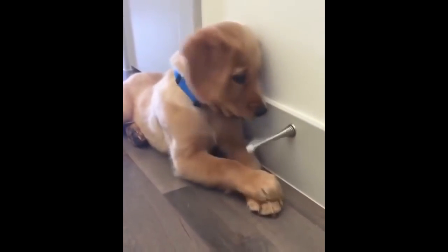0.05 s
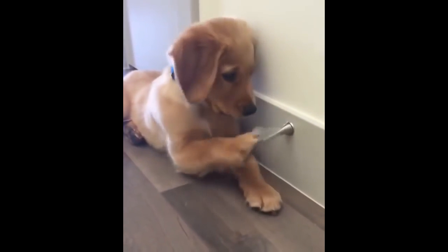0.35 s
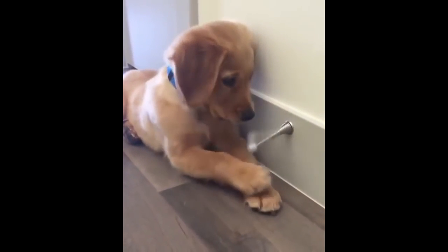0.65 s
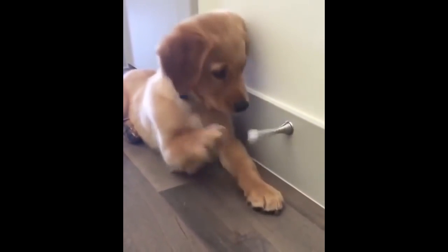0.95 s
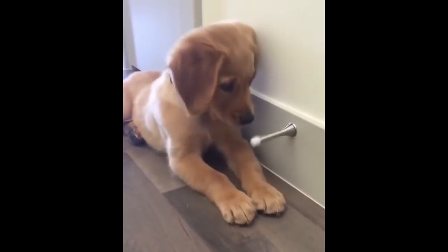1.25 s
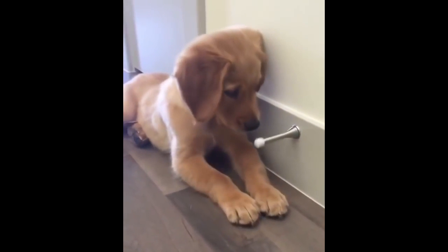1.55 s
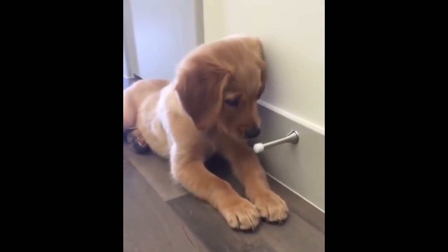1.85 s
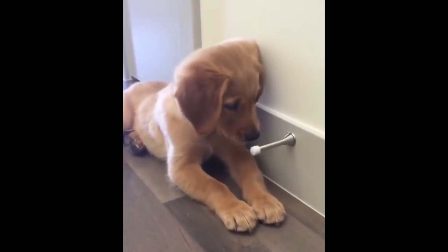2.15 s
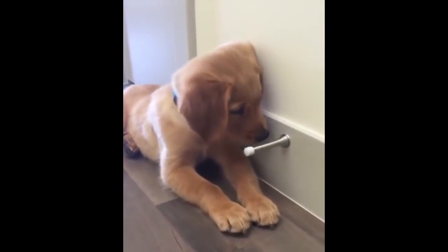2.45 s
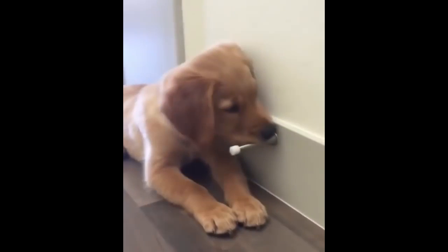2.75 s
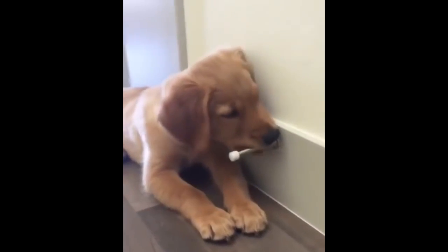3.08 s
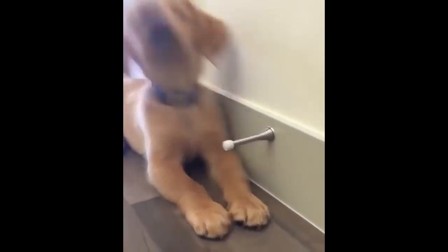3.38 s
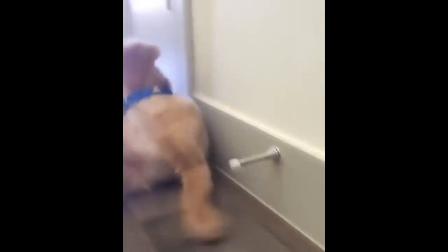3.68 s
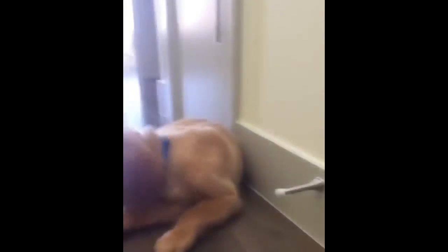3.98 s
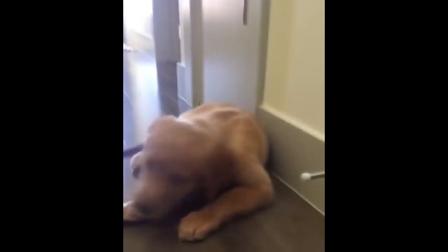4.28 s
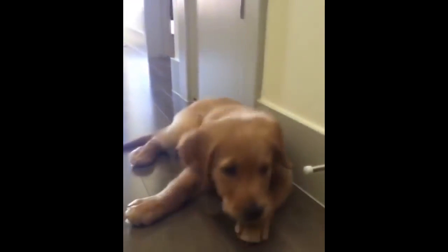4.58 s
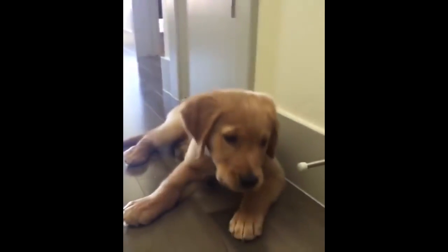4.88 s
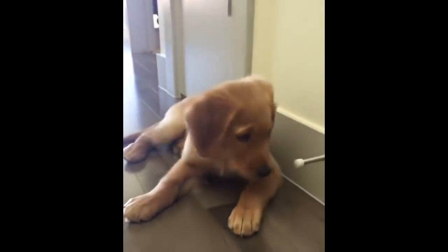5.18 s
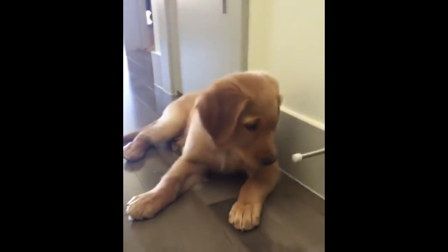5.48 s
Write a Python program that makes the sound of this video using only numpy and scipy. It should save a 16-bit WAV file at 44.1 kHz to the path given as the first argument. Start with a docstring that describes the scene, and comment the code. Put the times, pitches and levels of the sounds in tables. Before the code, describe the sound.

Right at the start, a puppy's paw flicks a coil spring door stopper close to the microphone. It gives a loud, rattling twang, with rapid metallic ticks and clanks and thumps from the skirting board over a lingering ring. At about 0.7 seconds a second flick renews the buzz, and a padded paw thud lands near 1.3 seconds. The rattle quickens as it weakens, settling into a soft purr from about 1.6 to 2.5 seconds, with a faint, thin squeak around 1.8 seconds. One quiet low note throbs near 2.6 seconds. The puppy's nose lightly taps the spring at about 2.8 seconds, and soft bumps follow until 3.4 seconds as it gets up. Fur and body brush faintly over the floor from 3.6 to 4 seconds, and a paw slides near 4.7 seconds. The quiet room's low hum remains until the end, at about 5.5 seconds.

```python
"""A brush of fur, then a rattling twang: a puppy paws twice at a coil-spring door stopper, close to the
microphone in a quiet room with a low hum. On every swing the coils clash: a tick, a clank and a thump
of the skirting board, over the long ring of wire and room. The swing settles to a soft purr, a thin
squeak and one last note. The puppy noses the spring, gets up and slides over the floor, and the
microphone follows it."""
import sys
import numpy as np
from scipy import signal
from scipy.fft import rfft, irfft
from scipy.io import wavfile

SR = 44100
rng = np.random.default_rng(int(sys.argv[2]) if len(sys.argv) > 2 else 0)


def log_audio(samples):
    """Write samples as a 16-bit WAV file to the path given in sys.argv[1]."""
    # one column per channel
    frames = np.atleast_2d(samples).T
    # limit to full scale, then quantise
    limited = np.clip(frames, -1, 1)
    pcm = np.round(limited * 32767).astype(np.int16)
    wavfile.write(sys.argv[1], SR, pcm)


N = 248283
TIME = np.arange(N) / SR


def from_db(db):
    """Decibels to gain."""
    return 10 ** (np.asarray(db) / 20)


def rms_one(x):
    """Scale to rms 1."""
    return x / np.sqrt(np.mean(x ** 2) + 1e-20)


def at_hz(points, hz):
    """Read (f/Hz, value) points on a log-frequency axis."""
    f, value = np.transpose(points)
    return np.interp(np.log(np.maximum(hz, 1)), np.log(f), value)


def colour(x, spectrum):
    """Give a signal a smooth spectrum of (f/Hz, level/dB) points."""
    hz = np.fft.rfftfreq(len(x), 1 / SR)
    return irfft(rfft(x) * from_db(at_hz(spectrum, hz)), len(x))


def band(x, low_hz, high_hz, order=2):
    """Causal band-pass."""
    sos = signal.butter(order, [low_hz, min(high_hz, .45 * SR)], "band", fs=SR, output="sos")
    return signal.sosfilt(sos, x)


def flutter(low_hz, high_hz):
    """Random wavering within a band, at rms 1."""
    return rms_one(band(rng.standard_normal(N), low_hz, high_hz))


def gate(start_s, end_s, edge_s):
    """Gain of 1 from start to end, with a ramp on either side."""
    return np.interp(TIME, [start_s - edge_s, start_s, end_s, end_s + edge_s], [0, 1, 1, 0])


def convolve(x, response):
    """Play a signal through an impulse response."""
    return signal.fftconvolve(x, response)[:N]


def mode(hz, t60):
    """One second of a sine that dies by 60 dB in t60 seconds."""
    t = TIME[:SR]
    return np.sin(2 * np.pi * hz * t) * from_db(-60 * t / t60)


def add(out, s, sound):
    """Mix a sound in at time s."""
    start = int(s * SR)
    out[start:start + len(sound)] += sound[:N - start]


def slides(grain=0.32, patchy_db=3.0, attack_s=0.037, release_s=0.036):
    """Fur, body and paws brush a surface: a hiss that catches unevenly and shifts as the contact moves."""
    # strokes: start/s, end/s, level/dB, what slides
    strokes = [(0.0, 0.05, -53.5, "fur"), (2.789, 2.853, -70, "fur"), (3.57, 3.67, -70.5, "fur"),
               (3.68, 3.784, -61.5, "body"), (3.813, 3.87, -64.5, "body"), (3.918, 3.948, -68.5, "fur"),
               (3.963, 4.04, -76, "body"), (4.262, 4.293, -74.5, "fur"), (4.605, 4.665, -64.5, "paw"),
               (4.674, 4.732, -60, "paw"), (4.745, 4.763, -64, "paw")]
    # colours of fur on the spring, and of body and paw on the floor: f/Hz, relative level/dB
    fur = [(700, -17.5), (1500, -2), (3500, -0.5), (6000, -2.5), (9000, -13), (14000, -12.5)]
    body = [(590, -42), (1000, -13.5), (1570, -9), (3190, -9), (3760, -0.5), (4800, -11), (6050, -4),
            (6910, -10.5), (8710, -7), (14000, -15)]
    paw = [(590, -42), (1000, -11.5), (1260, -16.5), (1520, -2), (2190, -2), (2980, -8.5), (3680, -7),
           (4390, -6), (8420, -5), (14000, -12)]
    hiss, edges = 0, np.geomspace(700, 16000, 9)
    for low, high in zip(edges, edges[1:]):
        pressure = from_db(patchy_db * flutter(3.7, 5.7))
        hiss = hiss + band(rng.standard_normal(N), low, high) * pressure
    hiss *= np.exp(grain * flutter(30, 300))
    spectra = {"fur": fur, "body": body, "paw": paw}
    coloured = {part: rms_one(colour(hiss, spectrum)) for part, spectrum in spectra.items()}
    out = np.zeros(N)
    for start, end, db, part in strokes:
        fade_db = 20 * (np.maximum(start - TIME, 0) / attack_s + np.maximum(TIME - end, 0) / release_s)
        out += coloured[part] * from_db(db - fade_db)
    return out


def room_tone(air_db=-60.5, waver=0.65):
    """Faint air noise and a wavering low hum, which drops as the microphone follows the puppy."""
    # colour of the air: f/Hz, relative level/dB
    air_colour = [(18, -35), (30, -10.5), (59, -2), (76, -12.5), (91, -2.5), (111, 1), (140, -17),
                  (212, -20), (311, -34), (345, -27), (446, -31.5), (548, -34), (871, -37.5), (1880, -43),
                  (14000, -56.5)]
    # tones of the hum: f/Hz, level/dB, half-width/Hz, change as the microphone moves/dB
    hum = [(54.3, -50, 3.9, -6), (104.5, -54.5, 2.6, -1)]
    # the microphone's move: start/s, end/s
    move_s = [3.7, 3.87]
    air = colour(rng.standard_normal(N), air_colour)
    air = band(air, 110, 18000) + from_db(-21.5) * band(air, 20, 84)
    out = from_db(air_db) * air / np.std(band(air, 130, 14000, order=4))
    for hz, db, width, change_db in hum:
        unsteady = flutter(hz - width, hz + width)
        tone = np.sin(2 * np.pi * (hz * TIME + rng.random()))
        out += from_db(db + np.interp(TIME, move_s, [0, change_db])) * (tone + waver * unsteady)
    return out


def swings(zero_s=2.249):
    """Running count of swings, zero at zero_s; the spring is at a turning point on whole numbers."""
    # wide swings are slow, and the spring speeds up as they shrink: t/s, swing rate/Hz
    swing_rate = [(0.05, 14.665), (0.54, 16.187), (0.73, 16.833), (1.0, 18.166), (1.25, 20.34),
                  (1.5, 23.553), (1.8, 24.018), (2.4, 25.129), (2.8, 25.8)]
    turns = np.cumsum(np.interp(TIME, *np.transpose(swing_rate))) / SR
    return turns - np.interp(zero_s, TIME, turns)


def purr(uneven_db=3.0, jitter_s=0.0013, fade_db_per_s=10.5, count=70):
    """Small swings nudge the board, higher one way and lower the other, while friction drains them."""
    # the two nudges: share of a swing after the turning point, lowest f/Hz, highest f/Hz, level/dB
    halves = [(0.17, 276, 385, -2), (0.64, 185, 280.3, 0.5)]
    # spells of purring: start/s, end/s, level at the start/dB
    spells = [(0.0, 0.03, -40), (1.573, 2.55, -45.5)]
    turns, out = swings(), 0
    draws = rng.standard_normal((len(halves), 2, count))
    for (share, low_hz, high_hz, db), (late, force) in zip(halves, draws):
        s = np.interp(np.floor(turns[0]) + np.arange(count) + share, turns, TIME) + jitter_s * late
        nudges = np.zeros(N)
        nudges[np.clip(s * SR, 0, N - 1).astype(int)] = from_db(uneven_db * force)
        out = out + from_db(db) * band(nudges + 1e-18, low_hz, high_hz, order=3)
    gain = sum(from_db(db - fade_db_per_s * np.maximum(TIME - start, 0)) * gate(start, end, edge_s=0.11)
               for start, end, db in spells)
    return out / np.std(out[:2 * SR]) * gain


def clash_rows(uneven_db=2.36, uneven_closing=0.28, blur_per_db=0.55, most_blur=1.6, count=64):
    """Every clash, laid out like knocks: coils close at each turn, harder on the side they lean to."""
    # clashes that stand out, as the coils slam shut or the nose taps them:
    # t/s, thump/dB, clank/dB, tick/dB, closing time/s, clank f/Hz, tick f/Hz
    knocks = [(0.051, -13, -19, -25, 0.00041, 1510, 8100), (0.0852, -12.5, -18, -27, .0011, 2020, 4200),
              (0.1183, -11.5, -12.5, -19, 0.00032, 1490, 10400),
              (0.1843, -16, -18.5, -25.5, 0.00091, 2250, 8600), (0.3467, -18, -19, -26, .0007, 1733, 4600),
              (0.5364, -16.5, -17, -31, 0.00069, 1150, 9000), (0.733, -11, -13.5, -27, 0.00091, 1540, 8400),
              (0.7593, -12, -14.5, -23, 0.00081, 2240, 8800), (0.793, -24.5, -38, -42, 0.0015, 2890, 8300),
              (0.8195, -16.5, -24, -26, 0.0016, 2760, 9200), (0.877, -20.5, -35, -35, 0.0013, 2976, 8200),
              (0.9057, -21, -24, -34.5, 0.00062, 1580, 7600), (0.9599, -20, -18.5, -32, 0.001, 2081, 5000),
              (0.989, -24.5, -25, -33, 0.0018, 2490, 9100), (1.0433, -19, -24, -37, 0.00088, 895, 8400),
              (1.0956, -20.5, -24, -38, 0.0014, 1457, 4100), (1.1256, -20, -25.5, -28, 0.00093, 1180, 6600),
              (1.147, -15, -20.5, -33.5, 0.0017, 2240, 5000), (1.176, -18.5, -19, -29.5, .0011, 1440, 5900),
              (1.198, -19, -33, -39.5, 0.0015, 2640, 9200), (1.227, -21, -28.5, -31, 0.0011, 1220, 5600),
              (1.3442, -20, -23.5, -46, 0.00067, 2150, 4500), (1.369, -18, -24.5, -29, .0007, 1250, 11500),
              (1.389, -21.5, -34, -47, 0.0016, 900, 4100),
              (1.414, -20.5, -27.5, -34.5, 0.00098, 1180, 6200),
              (1.459, -30, -39, -35.5, 0.0016, 2250, 6800), (1.476, -23.5, -30, -42, 0.001, 1940, 4100),
              (1.502, -21.5, -28.5, -38, .0013, 1150, 5300), (1.629, -24.5, -33, -38.5, 0.0011, 1077, 6600),
              (1.844, -30, -40, -67, 0.0014, 840, 4200), (2.049, -38.5, -51, -65, .0013, 846, 4200),
              (2.09, -36, -46, -63, 0.0018, 833, 4200), (2.13, -39, -62, -80, 0.0014, 833, 4200),
              (2.842, -44, -52, -59, 0.0019, 1700, 7060), (2.8552, -47, -46, -60, .0005, 1995, 4400)]
    # spells of rattling: first clash/s, end/s, back swing's lead/s,
    # clank over thump/dB, tick over thump/dB, closing time/s
    rattles = [(0.051, 0.55, 0.001, -1, -10, 0.00088), (0.7311, 1.49, 0.0016, -6, -9.5, .0012),
               (1.501, 1.825, 0.0021, -9, -16, 0.0013), (1.8454, 2.147, 0.001047, -4, -22, .0012),
               (2.169, 2.42, 0.00091, -14, -8, 0.00037)]
    # force of each twang: t/s, thump on the harder side/dB, lean (out swing minus back swing)/dB
    first_twang = [(0.15, -15, 8.5), (0.22, -20.5, -4), (0.3, -17.5, -3.5), (0.54, -20, -3)]
    second_twang = [(0.83, -31, -14), (0.92, -25, 2.5), (1.08, -26.5, -2.5), (1.179, -39, 7.5),
                    (1.28, -26.5, -1), (1.409, -20.5, 12.5), (1.499, -22.5, 8.5), (1.671, -24, 11),
                    (1.771, -38, 3), (1.85, -36.5, 10.5), (1.979, -50, 1.5), (2.099, -34.5, 13),
                    (2.17, -58, -1), (2.29, -55, 18), (2.41, -67.5, 14)]
    # share of the lean felt by: thump, clank, tick
    lean_share = [0.782, 1.6, 1.4]
    pitch_ranges_hz = (860, 2400), (4000, 10440)   # clank, tick: set by where the coils meet
    turns, rows = swings(), list(knocks)
    twang_s, force_db, lean_db = np.transpose(first_twang + second_twang)
    knock_s = np.array(knocks)[:, 0]
    for first, until, early_s, clank_db, tick_db, close_s in rattles:
        first_turn = np.interp(first, TIME, turns)
        for k, (chance, place) in enumerate(zip(rng.standard_normal((count, 4)), rng.random((count, 2)))):
            back = k % 2
            s = np.interp(first_turn + k / 2, turns, TIME) - back * early_s
            if s > until or np.min(np.abs(knock_s - s)) < .01:   # a knock replaces its swing's clash
                continue
            lean = np.interp(s, twang_s, lean_db)
            loss_db = max(0, lean if back else -lean) * np.array(lean_share)
            hard_side_db = np.interp(s, twang_s, force_db) + np.array([0, clank_db, tick_db])
            db = hard_side_db - loss_db + uneven_db * chance[:3]
            blur = min(1 + blur_per_db * loss_db[0], most_blur)   # the weaker side closes more slowly
            pitches = [low * (high / low) ** p for (low, high), p in zip(pitch_ranges_hz, place)]
            rows.append((s, *db, blur * close_s * np.exp(uneven_closing * chance[3]), *pitches))
    return rows


def coil(low_hz, high_hz, echo, travel_s=0.0013, echo_s=0.0031, size=4096):
    """One band of a clash: highs outrun lows down the wire, and the wave comes back once from the tip."""
    # colour of one clash: f/Hz, relative level/dB
    clash_colour = [(100, -8.5), (200, -7), (350, 3), (470, -10), (610, -7.5), (780, -6.5), (1100, -4.5),
                    (2100, -10), (3050, -11.5), (3700, -15), (4350, -14), (4950, -17.5), (6200, -14.5),
                    (7700, -22.5), (8550, -18.5), (9600, -22), (11000, -26.5), (13500, -21.5)]
    # broad resonances of board and coil: f/Hz, width/Hz, lift/dB
    resonances = [(155, 25, 2), (262, 21, 3), (293, 38, 0.5), (383, 140, 4), (544, 28, 4), (634.3, 77, 3.5),
                  (897, 31, 5), (1058, 110, 7), (1174, 100, 3), (1410, 110, 5), (1540, 180, 3),
                  (1830, 160, 6), (2050, 90, 3), (2200, 120, 5.5), (2520, 140, 4.5), (2780, 120, 1.5),
                  (3113, 110, 1.5)]
    hz = np.fft.rfftfreq(size, 1 / SR)
    phase = 4 * np.pi * travel_s * np.sqrt(1000 * hz)   # delay: travel_s at 1 kHz, falling as 1/sqrt(f)
    tip_echo = 1 + echo * np.exp(-2j * np.pi * hz * echo_s)
    spectrum = from_db(at_hz(clash_colour, hz)) * np.exp(-1j * phase) * tip_echo
    wave = band(irfft(spectrum), low_hz, high_hz, order=4)
    for centre_hz, width_hz, lift_db in resonances:
        peak = signal.iirpeak(centre_hz, centre_hz / width_hz, fs=SR)
        wave = wave + (from_db(lift_db) - 1) * signal.lfilter(*peak, wave)
    return wave


def vigour(thump_db, light_db=-48, hard_db=-24.5):
    """0 for a light touch of the coils, 1 for a clash hard enough to rebound and set the wire singing."""
    return np.interp(thump_db, [light_db, hard_db], [0, 1])


def wire_pitch(hz, sharpness, lift_db, size=4096):
    """Response of the short length of wire that a clash sets singing."""
    f = np.maximum(np.fft.rfftfreq(size, 1 / SR), 1)
    return 1 + (from_db(lift_db) - 1) / (1 + 1j * sharpness * (f / hz - hz / f))


def clashes(rows, levels_db, response, scatter, spread, brighten, lead_s, graze, rebound,
            pitched=None, rebound_s=0.0032, count=48, size=4096):
    """Each clash is one main contact amid a quick run of lesser ones: coils graze, close and rebound."""
    out, start = np.zeros(N), size // 8
    octaves = np.log2(np.maximum(np.fft.rfftfreq(size, 1 / SR), 100) / 1000)
    for k, (s, thump_db, _, _, close_s, _, _) in enumerate(rows):
        when, force, early = rng.random((3, count))
        offsets = -np.log(-np.log(when)) * spread * close_s   # builds up quickly, thins out slowly
        strengths = scatter * (2 * force - 1) ** 3   # a few bite, most barely touch
        offsets[::3] -= graze * close_s * early[::3]   # some graze first, the earlier the lighter
        strengths[::3] *= 1 - early[::3]
        offsets[1::3] += rebound_s   # some part and meet once more
        strengths[1::3] *= rebound * vigour(thump_db)
        contacts = np.zeros(size)
        contacts[np.clip(start + (offsets * SR).astype(int), 0, size // 2)] = strengths
        contacts[start] += 1
        # with brighten above 0, a harder contact is shorter, so brighter
        tilt = from_db(brighten * (levels_db[k] + 16.5) * octaves)
        hit = irfft(rfft(contacts) * rfft(response) * tilt * (pitched[k] if pitched else 1))
        hit *= np.sqrt(.01 * SR / np.sum(hit ** 2))   # the energy of 10 ms at rms 1
        add(out, s - lead_s - start / SR, from_db(levels_db[k]) * hit)
    return out


def spring():
    """The stopper close up: thump, clank and tick of its coils, the purr, and the modes they ring."""
    # clear modes of room, board and wire (the lowest, near 97 Hz, a mode of the room): f/Hz, relative level/dB,
    # t60/s
    clear_modes = [(96.8, -17, 1.4), (195.3, -29, 1.8), (250.7, -25.5, 0.39), (291.4, -34, .8),
                   (344, -33.5, .8), (372.7, -30, 1.1), (546, -30, .7), (883, -31.5, 0.63),
                   (1110, -35.5, 0.9), (1410, -38, 0.6), (1816, -37, .6), (2262, -39, 0.62)]
    rows = clash_rows()
    _, thump_db, clank_db, tick_db, _, clank_hz, tick_hz = np.transpose(rows)
    thump = clashes(rows, thump_db, coil(120, 720, echo=0.25), scatter=0.22, spread=1.1,
                    brighten=0.096, lead_s=.0011, graze=.5, rebound=1.2)
    thump += from_db(-46.5) * convolve(thump, mode(hz=287.0, t60=0.024))   # the board swings on briefly
    clank_notes = [wire_pitch(hz, sharpness=4.5, lift_db=4.5) for hz in clank_hz]
    clank = clashes(rows, clank_db, coil(790, 3400, echo=0.1), scatter=.5, spread=1.2,
                    brighten=0.43, lead_s=0.0007, graze=0.55, rebound=.9, pitched=clank_notes)
    tick_notes = [wire_pitch(hz, sharpness=11, lift_db=8.1 * vigour(db))
                  for hz, db in zip(tick_hz, thump_db)]
    tick = clashes(rows, tick_db, coil(3400, 15000, echo=.2), scatter=1.3, spread=.8,
                   brighten=-0.035, lead_s=0.00028, graze=3.4, rebound=.55, pitched=tick_notes)
    direct = thump + from_db(-0.5) * clank + from_db(0.4) * tick + purr()
    modes = sum(from_db(db) * mode(hz, t60) for hz, db, t60 in clear_modes)
    return direct + from_db(-37.0) * convolve(direct, modes)


def ring_response(attack_s=0.00066, early_lift=0.72, early_s=0.009):
    """Countless close modes of wire and room: noise that dies band by band."""
    # colour of the ring: f/Hz, level relative to the clash/dB
    ring_colour = [(100, -1), (190, -4), (330, -8.5), (550, -3.5), (850, -2), (1700, -2.07), (2400, -0.5),
                   (3100, 1.5), (3800, -2.5), (6000, -8.5), (8800, -9.5), (13000, -7)]
    # decay of the ring: f/Hz, t60/s
    ring_t60 = [(100, 0.78), (300, 1), (800, 0.9), (1800, 0.94), (4000, 0.87), (13000, 0.32)]
    t, out = TIME[:SR + SR // 2], 0
    edges = np.geomspace(70, 16000, 13)
    hz = np.fft.rfftfreq(len(t), 1 / SR)
    noise = rfft(rng.standard_normal(len(t))) * from_db(at_hz(ring_colour, hz))
    for low, high in zip(edges, edges[1:]):
        fade = from_db(-60 * t / at_hz(ring_t60, np.sqrt(low * high))) * (1 - np.exp(-t / attack_s))
        fade *= 1 + early_lift * np.exp(-t / early_s)   # floor and board send each clash straight back
        noise_band = irfft(noise * (hz >= low) * (hz < high), len(t))
        out = out + noise_band * fade / np.sqrt(np.sum(fade ** 2))
    return out


def ringing(x, whirls_per_s=1.7):
    """The plane of the swing wanders round, so the blows feed two sets of modes in turn."""
    angle = 2 * np.pi * (whirls_per_s * TIME + rng.random())
    return convolve(x * np.cos(angle), ring_response()) + convolve(x * np.sin(angle), ring_response())


def bumps(soft_s=0.0032, claw_s=0.0046):
    """A padded blow swells and rings briefly in floor or board; a claw ticks faintly with it."""
    # blows of paws and body, ahead of the band-pass: t/s, peak level/dB, f/Hz, t60/s, claw level/dB
    blows = [(0.056, -31, 88.7, 0.84, -77.5), (0.572, -33, 97.2, 0.24, -70),
             (1.268, -22.5, 151, 0.054, -54), (1.275, -35.5, 104.6, 0.052, -79),
             (2.926, -44, 279, 0.07, -76), (3.036, -36, 321.8, 0.017, -77), (3.064, -36.5, 206, 0.026, -69),
             (3.102, -39, 150, 0.023, -81.5), (3.393, -34.5, 310, 0.052, -50.5),
             (4.278, -58, 201.3, .04, -59)]
    out, t = np.zeros(N), TIME[:SR]
    for s, db, hz, t60, claw_db in blows:
        thud = mode(hz, t60) * (1 - np.exp(-t / soft_s))
        claw = band(rng.standard_normal(SR), 500, 6000, order=1) * np.exp(-t / claw_s)
        add(out, s, from_db(db) * thud / np.max(np.abs(thud)) + from_db(claw_db) * claw)
    return band(out, 96, 15000)


def squeak(pitch_hz=3610, bend_hz=15, wander_hz=26, out_swing=0.467, rough=0.33, lag_s=0.01):
    """The wire rubs in its cup just after each turn, most on the back swing; pressure bends the pitch."""
    # swell and fade of the squeak: t/s, level/dB
    loudness = [(1.68, -62), (1.8, -59), (1.95, -62), (2.08, -67), (2.17, -74), (2.25, -92)]
    side = -np.cos(2 * np.pi * np.interp(TIME - lag_s, TIME, swings()))
    rub = np.abs(side) * np.where(side > 0, 1, out_swing) * np.exp(rough * flutter(9.5, 160))
    hz = pitch_hz + bend_hz * (rub - .5) + wander_hz * flutter(2.4, 106)
    s, db = np.transpose(loudness)
    gain = from_db(np.interp(TIME, s, db)) * (TIME >= s[0]) * (TIME <= s[-1])
    return rms_one(np.sin(2 * np.pi * np.cumsum(hz) / SR) * rub) * gain


def last_note(start_s=2.58, end_s=2.71, db=-57, hz=339, throb=0.38):
    """The last tiny swings leave one low note of the wire, throbbing until it comes to rest."""
    tone = np.sqrt(2) * np.sin(2 * np.pi * hz * TIME)
    throbbing = 1 + throb * np.sin(2 * np.pi * swings())
    return from_db(db) * gate(start_s, end_s, edge_s=0.072) * throbbing * tone


def scene():
    """One microphone close to spring and puppy, the room around them."""
    stopper = spring()
    puppy = bumps() + slides()
    close = stopper + squeak() + last_note() + puppy
    ring = ringing(stopper + from_db(-0.5) * puppy)
    return (close + ring + room_tone())[None]


def record(dry, ceiling=0.92, cutoff_hz=14000):
    """The highest peaks are rounded and the top of the treble is cut."""
    rounded = dry / (1 + np.abs(dry / ceiling) ** 8) ** (1 / 8)
    return signal.sosfilt(signal.ellip(10, .3, 70, cutoff_hz, fs=SR, output="sos"), rounded)


dry = scene()
out = record(dry)
log_audio(out)
```